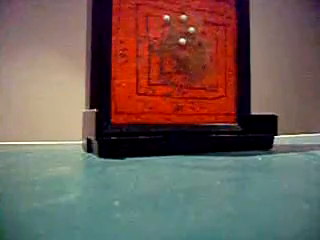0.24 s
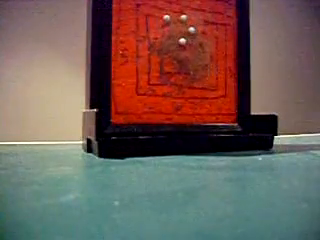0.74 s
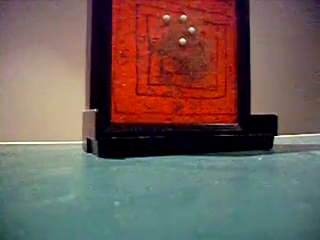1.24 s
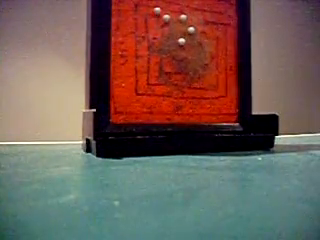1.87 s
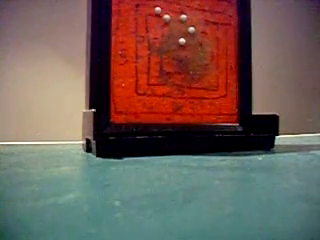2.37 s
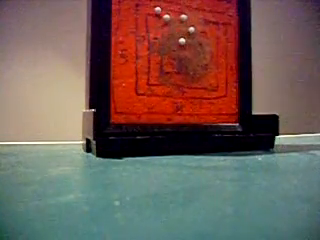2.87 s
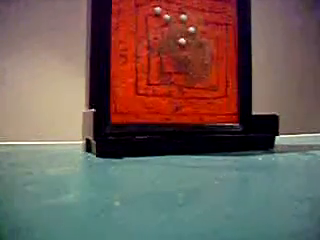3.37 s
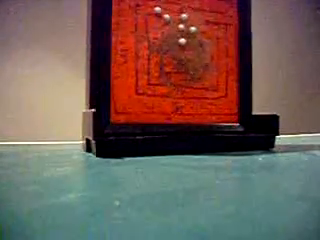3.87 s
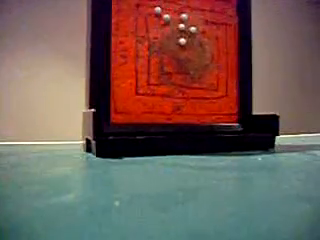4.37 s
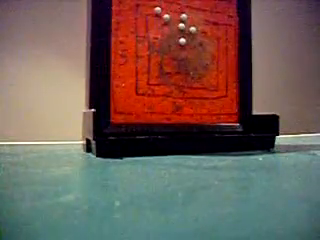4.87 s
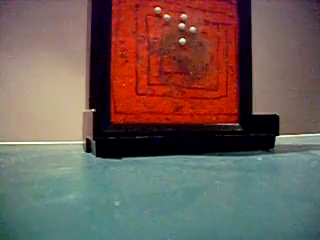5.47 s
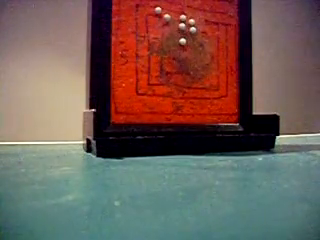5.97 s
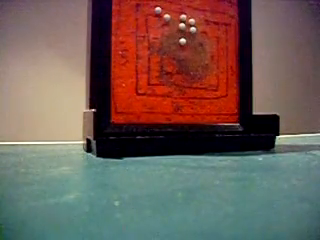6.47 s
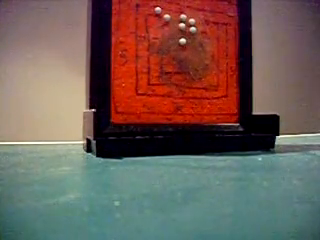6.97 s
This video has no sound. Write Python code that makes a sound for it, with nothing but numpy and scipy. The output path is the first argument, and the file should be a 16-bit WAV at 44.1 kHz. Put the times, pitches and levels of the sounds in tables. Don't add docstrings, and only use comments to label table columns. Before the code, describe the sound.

A spring pellet pistol pops four times in a small hard room, each pellet thudding into a hollow box, each shot followed by clacking re-cocking.

```python
import sys
import numpy as np
from scipy import signal
from scipy.fft import rfft, irfft
from scipy.io import wavfile
from scipy.ndimage import uniform_filter1d

SR = 44100
rng = np.random.default_rng(int(sys.argv[2]) if len(sys.argv) > 2 else 0)


def put_to_file(sound):
    columns = np.atleast_2d(sound).T
    safe = np.clip(columns, -1, 1)
    whole_steps = np.round(safe * 32767)
    wavfile.write(sys.argv[1], SR, whole_steps.astype(np.int16))


def how_loud(loudness_db):
    steps = np.asarray(loudness_db, float) / 20
    return 10 ** steps


N = 318402

# start in [s], peak level in [dB], body lift in [dB], treble lift in [dB].
POPS = [
    (0.032, 4.5, -4, -5.5),
    (2.066, 4, -17.5, -3.5),
    (4.022, 3.5, 0.5, 0.5),
    (5.93, 3, -7, -2.5),
]
# start in [s], peak level in [dB], body lift in [dB], treble lift in [dB].
SNAPS = [
    (0.858, -3.5, 0, 9),
    (2.852, -2.5, -1.5, 10),
    (4.838, -5, 2, 12),
    (6.745, -3.5, 0.5, 11),
]
# start in [s], peak level in [dB], body lift in [dB], treble lift in [dB].
TICKS = [
    (0.619, -18, 2, -4),
    (0.6337, -16, 2, 9),
    (2.6522, -14.5, 1, 3),
    (2.6651, -16, -11, 9),
    (2.678, -18, -2, 10),
    (4.6045, -17, 5, -18),
    (4.619, -17.5, -2, 9),
    (6.5192, -15.5, -5, 3.5),
    (6.5345, -20, -9, 3),
]
# frequency in [Hz], level in [dB].
POP = [(88, -41.5), (150, -10), (380, -2), (805, 3), (1180, -6.5), (1460, -4), (2200, -6.5), (2510, -4),
       (3490, -7.5), (5020, -10.5), (6420, -11.5), (7700, -18), (10000, -55), (16900, -120)]
# frequency in [Hz], level in [dB].
SLIDE = [(180, -58.5), (300, -19), (445, -20), (523, -12.5), (735, -17.5), (951, -12.5), (1250, -18.5),
         (1780, 0), (2150, -7.5), (3230, -7), (4720, -14.5), (6720, -12), (7700, -20.5), (10000, -23),
         (16900, -120)]
BOX_BODY, SLIDE_BODY = (676, 170), (1940, 640)
POP_LEAD_S, SNAP_LEAD_S = 0.0135, 0.022


def evened(x):
    return x / np.sqrt(np.mean(x ** 2) + 1e-20)


def read(points, hz):
    f, value = np.transpose(points)
    return np.interp(np.log(hz + 1), np.log(f + 1), value)


def add(mix, s, sound):
    part = mix[round(s * SR):][:len(sound)]
    part += sound[:len(part)]


def ring(spectrum, body, body_db, treble_db):
    hz = np.fft.rfftfreq(4096, 1 / SR)
    treble = (6720, 3700)  # (Hz, width Hz)
    gain_db = read(spectrum, hz)
    for (centre, width), db in [(body, body_db), (treble, treble_db)]:
        gain_db = gain_db + db / (1 + (2 * (hz - centre) / width) ** 2)
    log_gain = np.log(how_loud(np.maximum(gain_db, -70)))
    circle = np.r_[log_gain, log_gain[-2:0:-1]]
    response = np.fft.ifft(np.exp(np.conj(signal.hilbert(circle)))).real[:2048]
    return response / np.linalg.norm(response)


def tail(onset_s):
    # frequency in [Hz], t60 in [s].
    decay = [(60, 0.71), (300, 0.52), (500, 0.46), (720, 0.5), (1300, 0.49), (1850, 0.53), (2600, 0.4),
             (3400, 0.6), (4500, 0.53), (5800, 0.41), (7700, 0.39)]
    lumps_db = 2.4
    taps = np.zeros(32000)
    at = np.arange(0, 31990, 10) + rng.integers(0, 10, 3199)
    taps[at] = rng.choice([-1., 1.], len(at))
    hz, t, z = signal.stft(taps, SR, nperseg=256)
    lumps = uniform_filter1d(rng.standard_normal(z.shape), size=4, axis=0)
    lumps = evened(uniform_filter1d(lumps, size=4, axis=1))
    level_db = lumps_db * lumps - 60 * t / read(decay, hz)[:, None]
    field = signal.istft(z * how_loud(level_db), SR, nperseg=256)[1]
    field = field * np.clip(np.arange(len(field)) / SR / onset_s, 0, 1)
    return field / np.linalg.norm(field)


def hits(rows, spectrum, body, t60, lead_s, growth, gain_db, wet_db, onset_s, swell_db, rise_s):
    # delay in [s], level in [dB].
    walls = [
        (0.015, -11.5),
        (0.024, -16),
        (.034, -14.5),
        (0.048, -23),
        (0.063, -17),
    ]
    out, t = np.zeros(N), np.arange(8000) / SR
    for s, db, body_db, treble_db in rows:
        blow = how_loud(-60 * t / (t60 * np.exp(growth * db))) * np.clip(t / rise_s, 0, 1)
        shape = how_loud(swell_db) * (t / lead_s) ** 2.74 * (t < lead_s)
        for delay, echo_db in [(0.0012, 0.021), *walls]:
            add(shape, lead_s + delay, how_loud(echo_db) * blow[:3000])
        room = how_loud(wet_db) * np.linalg.norm(blow) * tail(onset_s)
        drive = np.r_[np.zeros(round(lead_s * SR)), room]
        add(drive, 0, shape * rng.standard_normal(len(t)))
        struck = signal.fftconvolve(drive, ring(spectrum, body, body_db, treble_db))
        add(out, s - lead_s, how_loud(db + gain_db) * struck)
    return out


def hiss():
    # frequency in [Hz], level in [dB].
    colour = [(12, -29.5), (20, 2.5), (81, -7.5), (193, -9.5), (267, -10.5), (523, -14.5), (1190, -19.5),
              (1690, -20.5), (1860, -21), (3830, -24.5), (6310, -22.5), (7700, -27), (10000, -69.5),
              (16900, -120)]
    hz = np.fft.rfftfreq(N, 1 / SR)
    noise = irfft(rfft(rng.standard_normal(N)) * how_loud(read(colour, hz)), N)
    return how_loud(-50.5) * evened(noise)


def pops():
    return hits(POPS, POP, BOX_BODY, t60=0.043, lead_s=POP_LEAD_S, growth=0.001,
                gain_db=-1.7, wet_db=-2.65, onset_s=0.0087, swell_db=-22, rise_s=0.00085)


def thuds():
    # start in [s], peak level in [dB], body lift in [dB], treble lift in [dB].
    blows = [
        (0.056, -1.5, -3, -1.5),
        (2.092, -2.5, -19, -5.5),
        (4.046, 3.5, 6.5, 19.5),
        (5.955, -17, -4, 2.5),
    ]
    # frequency in [Hz], level in [dB].
    colour = [(24, -50), (40, -8.5), (243, -21.5), (284, -9), (781, 8), (1270, -5), (1650, -3.5),
              (2560, -15), (3120, -2.5), (5070, -22), (6600, -18.5), (7700, -41), (10000, -60),
              (16900, -120)]
    return hits(blows, colour, BOX_BODY, t60=0.064, lead_s=0.0026, growth=0.07,
                gain_db=-3.8, wet_db=-1.1, onset_s=0.006, swell_db=-4.5, rise_s=0.00056)


def booms():
    # start in [s], peak level in [dB], pitch in [Hz], share sent to the room in [dB].
    hollow = [
        (0.057, 7.5, 703, -11.5),
        (2.094, 4, 913, -19.5),
        (4.046, -0.5, 684, -1),
        (5.955, 6.5, 665, -7),
        (4.074, -1, 725, -3),
        (4.099, -3.5, 754, -3),
        (4.198, -10, 746, -7),
    ]
    out, t = np.zeros(N), np.arange(6000) / SR
    t60 = 0.056
    for s, db, hz, wet_db in hollow:
        modes = sum(size * np.sin(2 * np.pi * ratio * hz * t)
                    for ratio, size in [(.87, 0.328), (1, 1), (1.21, 0.35)])
        boom = how_loud(db - 8.5 - 60 * t / t60) * modes
        add(out, s, signal.fftconvolve(boom, np.r_[1, how_loud(wet_db) * tail(.018)]))
    return out


def rocks():
    # start in [s], peak level in [dB], pitch in [Hz].
    thumps = [(0.081, -16, 37.7), (0.142, -13.5, 80), (0.199, -32, 95), (2.11, -15, 45.8),
              (2.179, -12.5, 82), (2.237, -28, 37.7), (4.029, -12.5, 110), (4.069, -14.5, 37.7),
              (4.129, -17, 95), (4.2, -45, 74), (5.958, -13, 40.4), (6.028, -12, 73.4), (6.12, -36, 38)]
    out, t = np.zeros(N), np.arange(8000) / SR
    t60, sag_s = 0.042, 0.00803
    bent_t = t + sag_s * (1 - np.exp(-t / sag_s))
    for s, db, hz in thumps:
        envelope = how_loud(db - 60 * t / t60) * np.clip(t / 0.0033, 0, 1)
        add(out, s, envelope * np.sin(2 * np.pi * hz * bent_t))
    return out + how_loud(-2.5) * signal.fftconvolve(out, tail(.008))[:N]


def rattles():
    # start in [s], peak level in [dB], body lift in [dB], treble lift in [dB].
    knocks = [(0.083, -1.5, -12.5, -9.5), (0.142, -1, -1, -22), (2.117, -9, 3, 16.5),
              (2.135, 0.5, -2.5, -6), (2.178, -10, 24, -17), (4.071, 10.5, -20, 4), (4.084, 3.5, -12, 13.5),
              (4.108, 2, -12, 16), (4.134, -8.5, 5, 15), (4.173, -5, 17, 7), (5.984, -21, -1, -7),
              (6.039, -8, -7, -22), (6.063, -28, -3, 3.5)]
    return hits(knocks, POP, BOX_BODY, t60=0.02, lead_s=0.002, growth=0.001,
                gain_db=-8.0, wet_db=-4.5, onset_s=0.019, swell_db=-15.5, rise_s=0.00094)


def catches():
    # start in [s], peak level in [dB], body lift in [dB], treble lift in [dB].
    clicks = [
        (0.602, -19, 9, -45),
        (2.61, -36, 6, -25),
        (2.6391, -17.5, 14, -7),
        (4.5844, -22, 7, -31),
        (4.592, -26, -6, -48),
        (4.8168, -17, 7, -36),
        (5.902, -39, 6, -26),
        (6.5024, -25, -7, -42),
    ]
    return hits(clicks, SLIDE, (1636, 300), t60=0.032, lead_s=0.00148, growth=-0.034,
                gain_db=-9, wet_db=-5, onset_s=0.021, swell_db=-6, rise_s=0.0017)


def ticks():
    return hits(TICKS, SLIDE, SLIDE_BODY, t60=0.041, lead_s=0.00096, growth=0.001,
                gain_db=-9, wet_db=-1.0, onset_s=0.013, swell_db=1, rise_s=0.0006)


def pings():
    out, t = np.zeros(N), np.arange(3000) / SR
    hz, lift_db, t60 = 6100, -9, 0.03
    for s, db, *_ in TICKS:
        chatter = evened(uniform_filter1d(rng.standard_normal(len(t)), size=36))
        envelope = how_loud(db + lift_db - 60 * t / t60) * np.clip(2000 * t, 0, 1)
        add(out, s, envelope * chatter * np.sin(2 * np.pi * hz * t))
    return out


def drags():
    # start in [s], latch in [s], end in [s], force in [dB].
    strokes = [
        (0.621, 0.673, .84, -11),
        (2.649, 2.708, 2.84, 3),
        (4.604, 4.664, 4.82, -15),
        (6.515, 6.573, 6.73, 6),
    ]
    pull_db, strain_db, latch_db, settle_db, rest_db, let_go_db = -23, -34, 2, -35, -33, -35
    surge_s, settle_s, let_go_s = 0.009, 0.012, 0.008
    out = np.zeros(N)
    for start, latch, end, force_db in strokes:
        t = np.arange(start, end, 1 / SR)
        size_draw, sign_draw, when_draw = rng.random((10000, 3))[:len(t)].T
        sizes = how_loud(1.8 * np.minimum(-np.log(size_draw + 1e-9), 2))
        slips = (sign_draw - .5) * sizes * (when_draw < 2500 / SR)
        db = np.interp(t, [start, latch - surge_s, latch, latch + settle_s, end - let_go_s, end],
                       [pull_db, strain_db, latch_db, settle_db, rest_db, let_go_db])
        scrape = evened(slips) * how_loud(db + force_db - 27.5) * signal.windows.tukey(len(t), .1)
        heard = signal.fftconvolve(scrape, np.r_[1, how_loud(-3) * tail(.012)])
        add(out, start, signal.fftconvolve(heard, ring(SLIDE, SLIDE_BODY, -3, 0.1)))
    return out


def latches():
    # start in [s], peak level in [dB], body lift in [dB], treble lift in [dB].
    clicks = [(0.6782, -22, 6, 10), (0.6819, -13, -0.5, 4), (0.7801, -23.5, -4, -1),
              (2.6965, -8.5, 7.5, 4.5), (2.7107, -24.5, 0, 1), (4.6569, -11.5, -2.5, -0.5),
              (4.67, -31, 10, 4), (4.693, -38, 7, -2), (4.7453, -33, -10, -16), (6.575, -17.5, 0, -3.5),
              (6.6505, -30, 2, -9), (0.843, -26, -7, -2), (6.731, -16.5, -10, 11)]
    return hits(clicks, SLIDE, SLIDE_BODY, t60=0.048, lead_s=0.0035, growth=0.0059,
                gain_db=-9, wet_db=-1.0, onset_s=0.013, swell_db=1, rise_s=0.0006)


def snaps():
    # frequency in [Hz], level in [dB].
    colour = [(88, -80), (150, -20.5), (403, -7), (483, -7), (551, -2.5), (730, -9), (982, 3), (1300, -4.5),
              (1810, 7.5), (2430, -1), (3550, -1), (6420, -11), (7700, -18.5), (10000, -71), (16900, -120)]
    return hits(SNAPS, colour, SLIDE_BODY, t60=0.026, lead_s=SNAP_LEAD_S, growth=0.001,
                gain_db=0.73, wet_db=-4.0, onset_s=0.027, swell_db=-13.5, rise_s=0.00057)


def spring():
    # frequency in [Hz], level in [dB], t60 in [s].
    modes = [
        (1760, -22, 0.11),
        (1930, -36, 0.65),
        (3140, -30, 0.26),
        (3410, -22.5, 0.22),
    ]
    out, t = np.zeros(N), np.arange(20000) / SR
    for s, *_ in SNAPS:
        for hz, db, t60 in modes:
            detune = rng.uniform(1.0, 1.015)
            add(out, s, how_loud(db - 60 * t / t60) * np.sin(2 * np.pi * hz * detune * t))
    return out


def scene():
    shot = pops() + thuds() + booms() + rocks() + rattles()
    cocking = catches() + ticks() + pings() + drags() + latches()
    slam = snaps() + spring()
    return (hiss() + shot + cocking + slam)[None]


def brief_dips():
    t = np.arange(N) / SR
    starts = [row[0] - POP_LEAD_S for row in POPS] + [row[0] - SNAP_LEAD_S for row in SNAPS]
    return how_loud(sum(-5 * np.exp(-((t - s + .003) / .005) ** 2) for s in starts))


def roll_off(x):
    return signal.sosfilt(signal.butter(12, 16660, fs=SR, output="sos"), x)


def record(dry):
    camera_sr = 16000
    band = signal.firwin(601, 7620, window=("kaiser", 9), fs=SR)
    sampled = signal.oaconvolve(np.clip(dry[0], -.8, .8) * brief_dips(), band, "same")
    mirrored = 2 * sampled * np.cos(2 * np.pi * camera_sr * np.arange(N) / SR)
    leak = signal.firwin(121, [7000, 8500], pass_zero=False, window=("kaiser", 8), fs=SR)
    image = signal.oaconvolve(mirrored, leak, "same")
    clipped = np.clip(sampled + how_loud(-11.5) * image, -.73, .73)
    top = signal.firwin(301, 15900, window=("kaiser", 9), fs=SR)
    return roll_off(signal.oaconvolve(clipped, top, "same")[None])


dry = scene()
out = record(dry)
put_to_file(out)
```